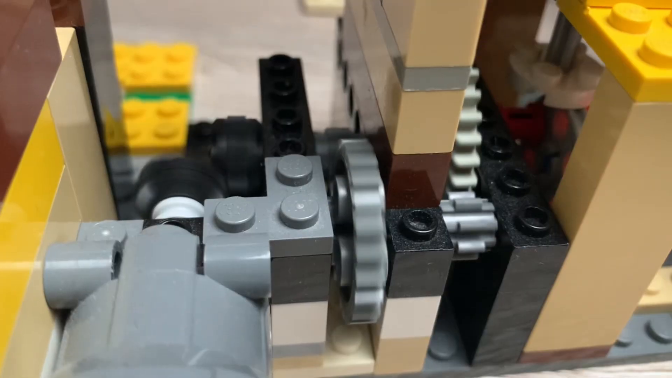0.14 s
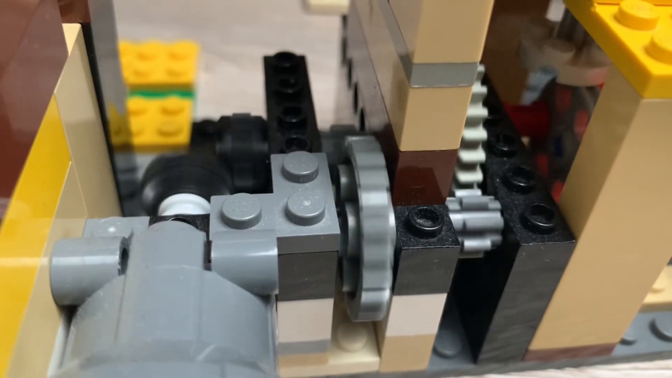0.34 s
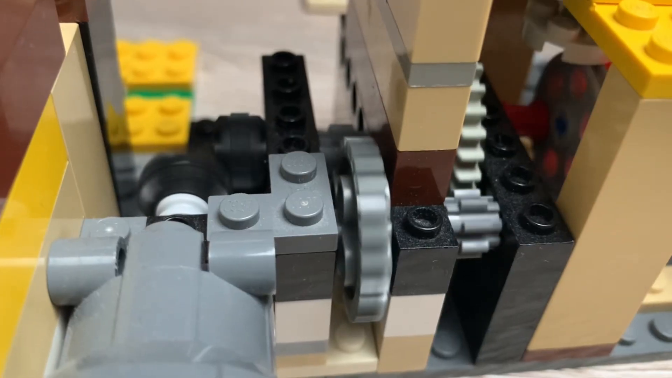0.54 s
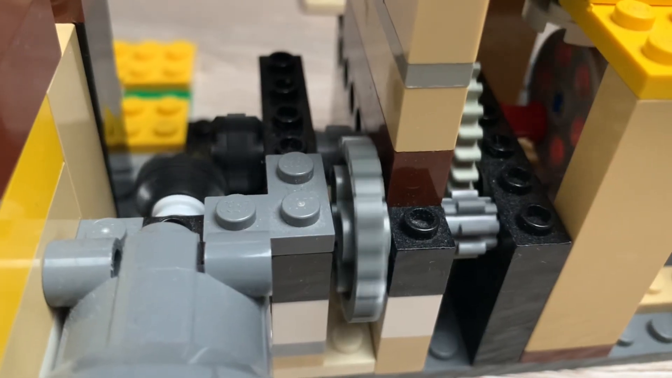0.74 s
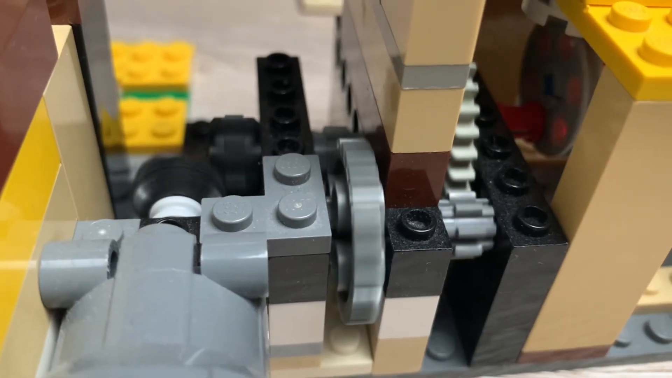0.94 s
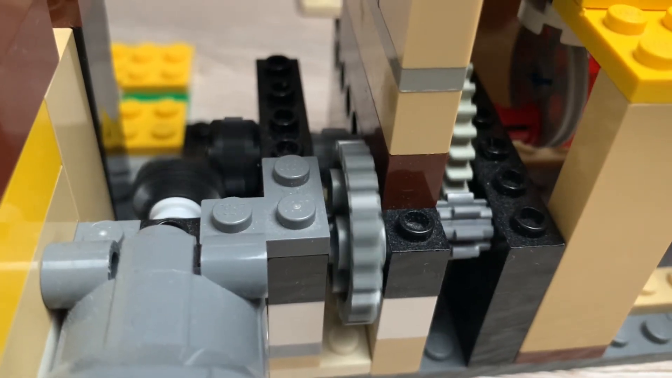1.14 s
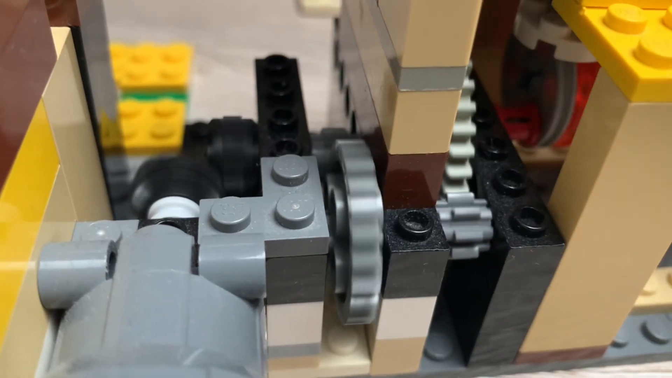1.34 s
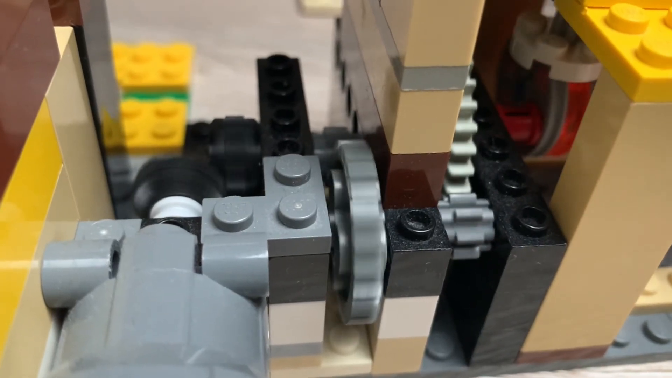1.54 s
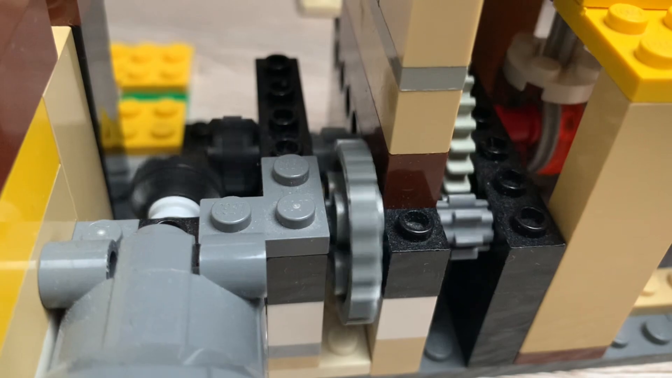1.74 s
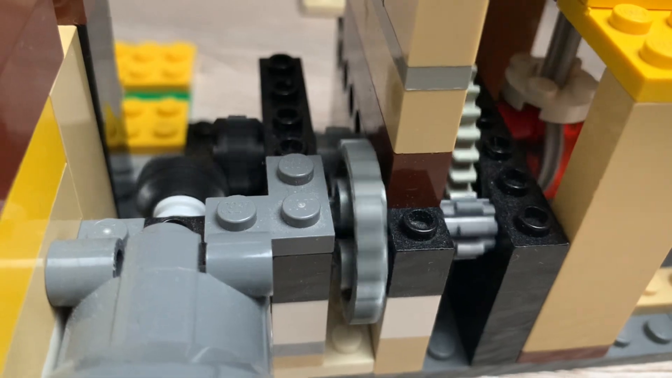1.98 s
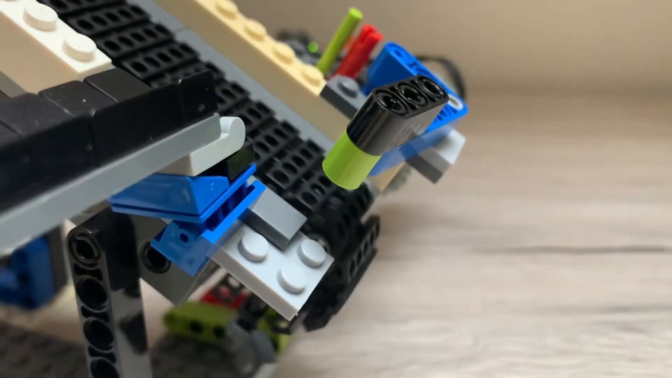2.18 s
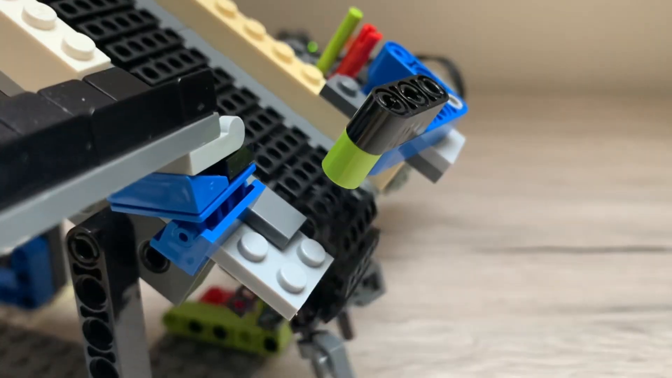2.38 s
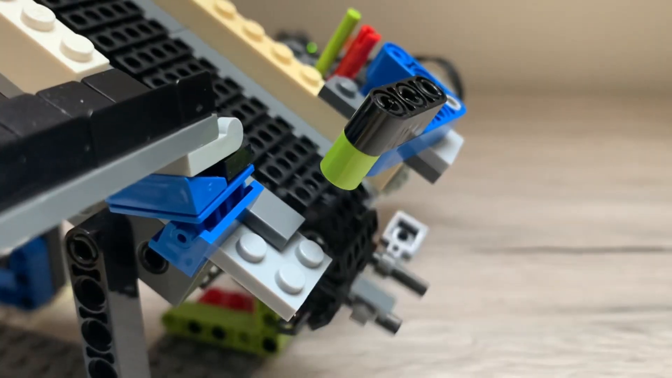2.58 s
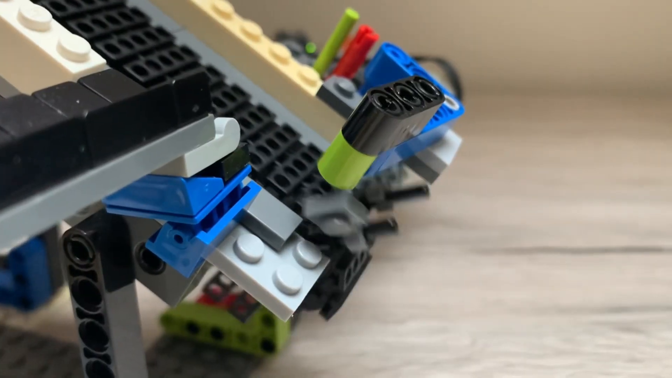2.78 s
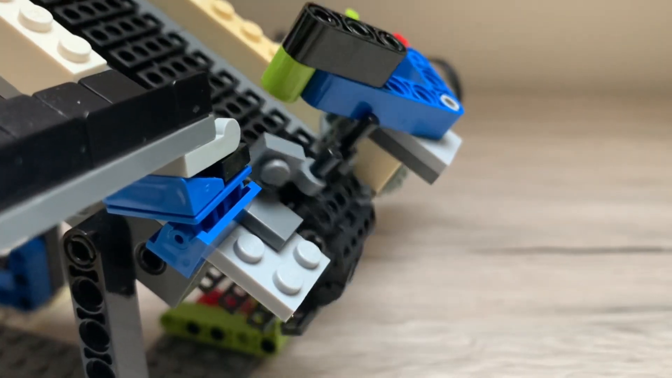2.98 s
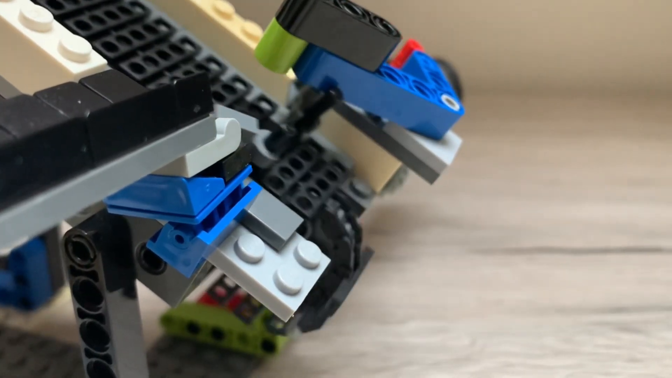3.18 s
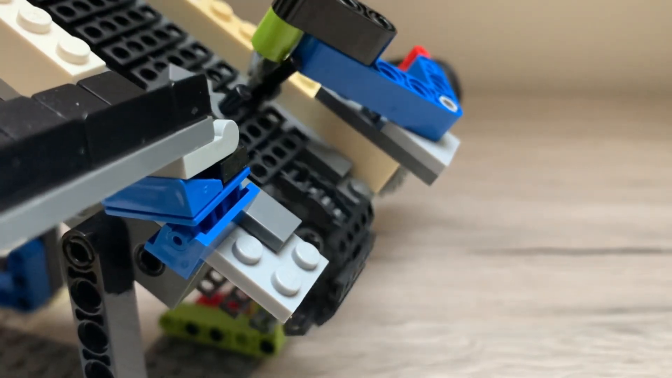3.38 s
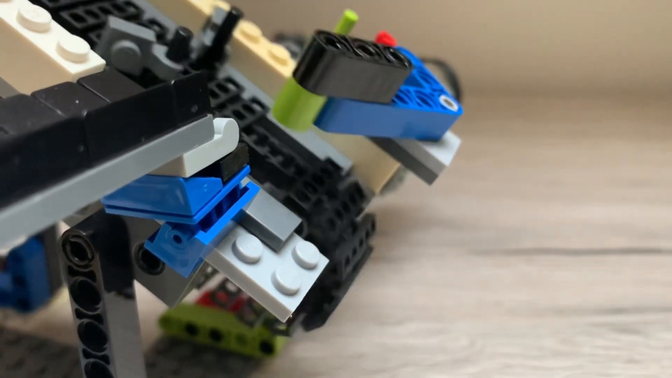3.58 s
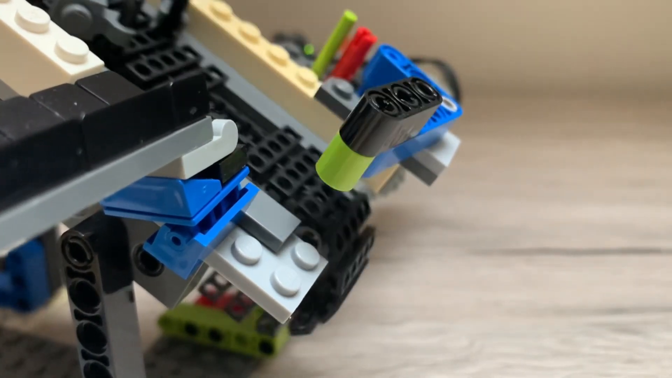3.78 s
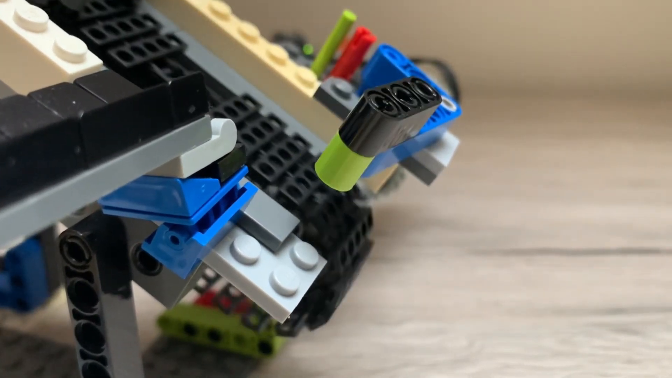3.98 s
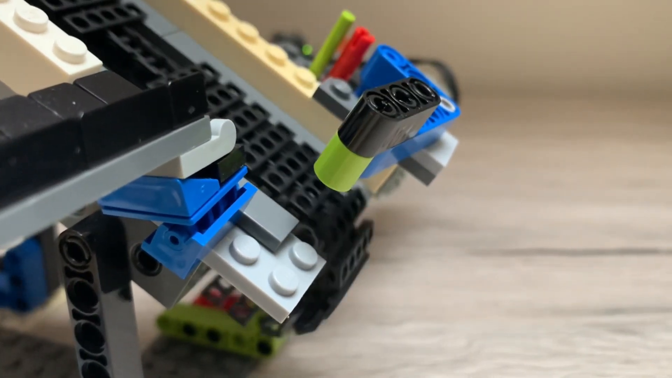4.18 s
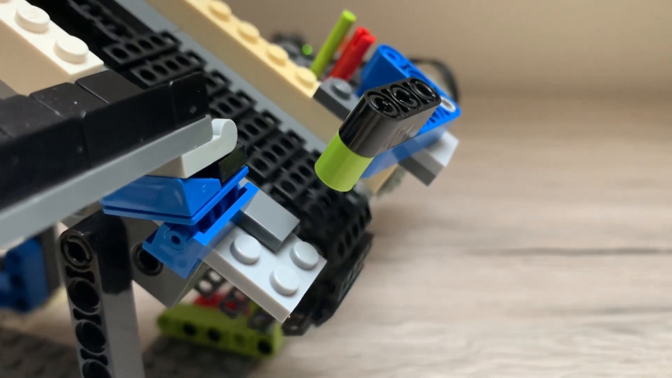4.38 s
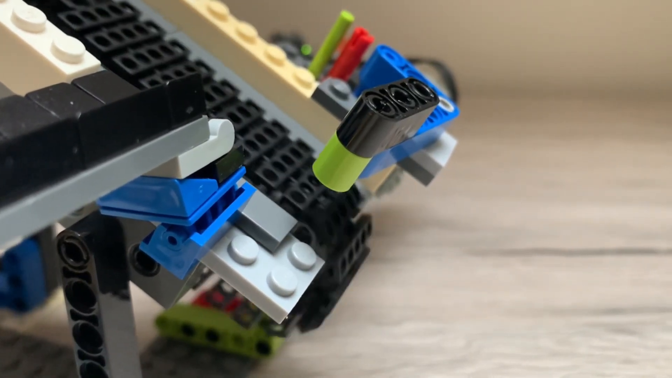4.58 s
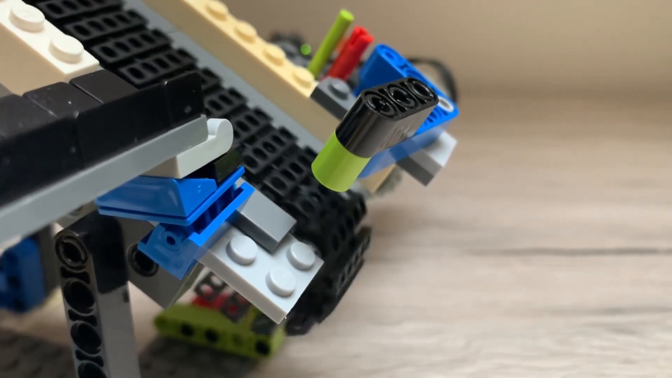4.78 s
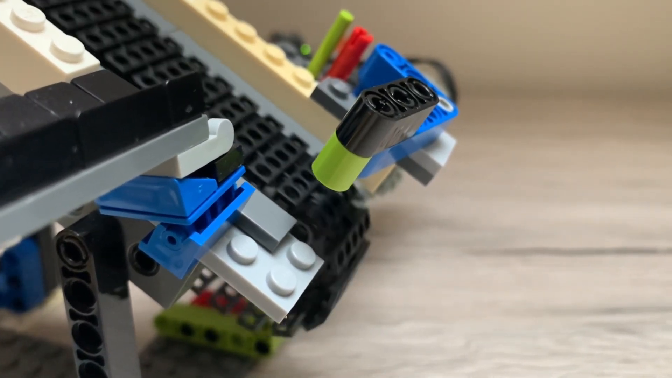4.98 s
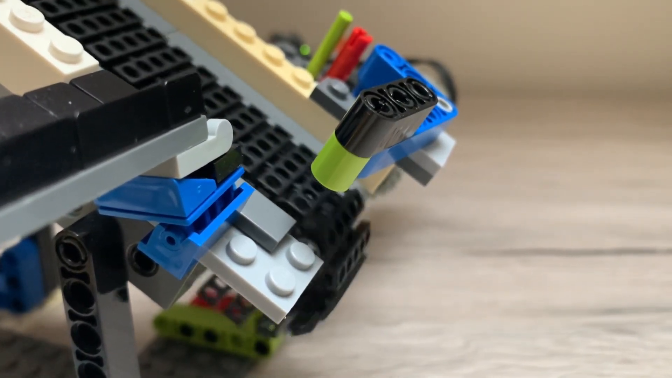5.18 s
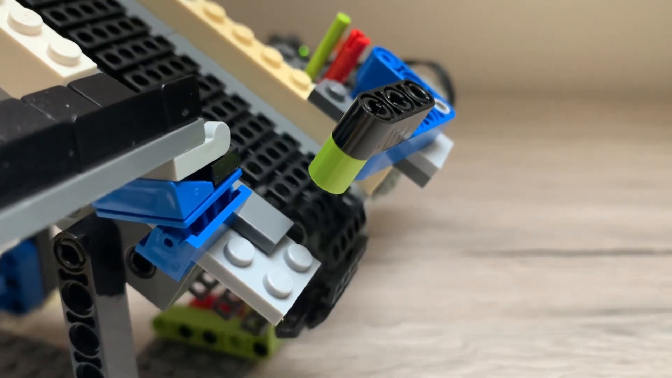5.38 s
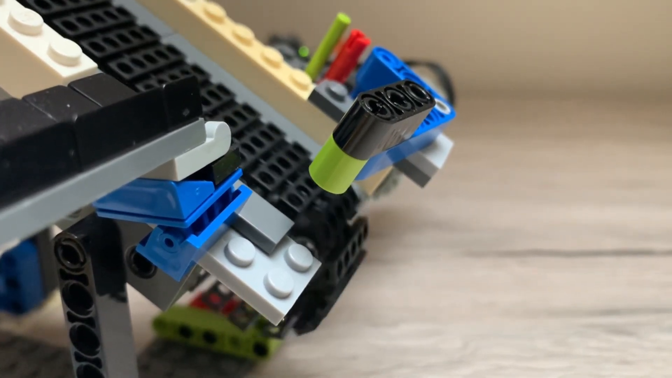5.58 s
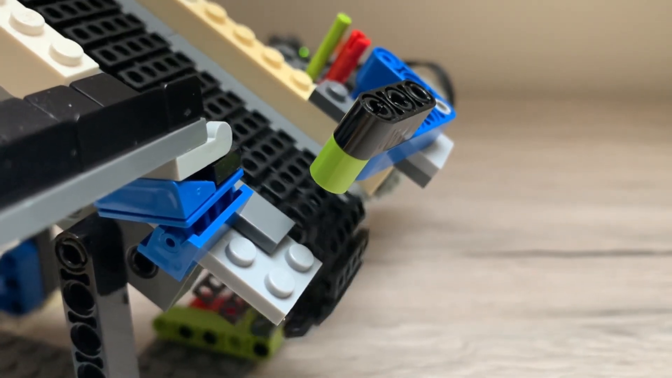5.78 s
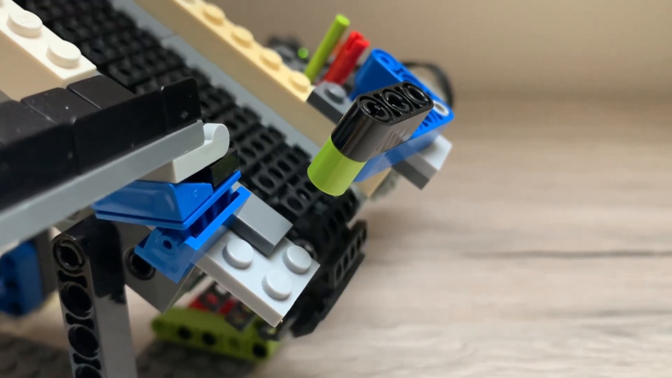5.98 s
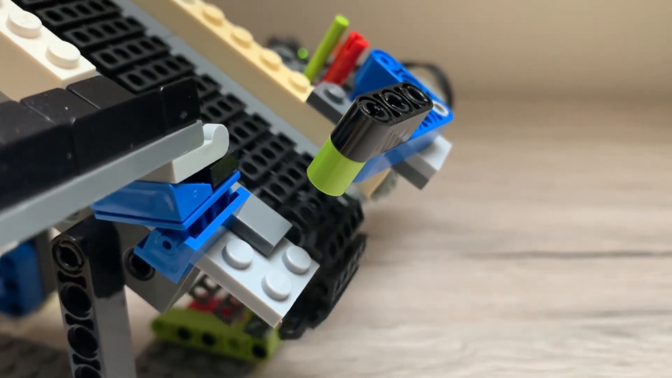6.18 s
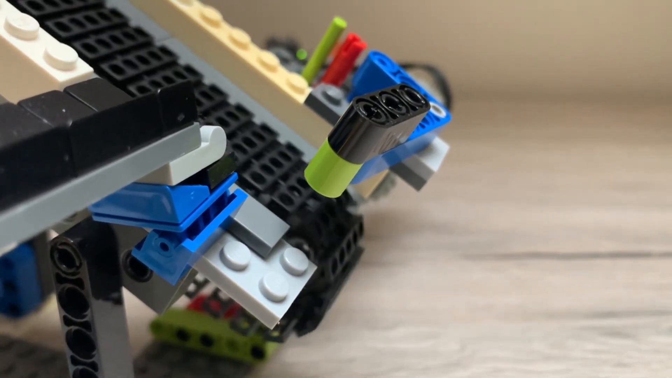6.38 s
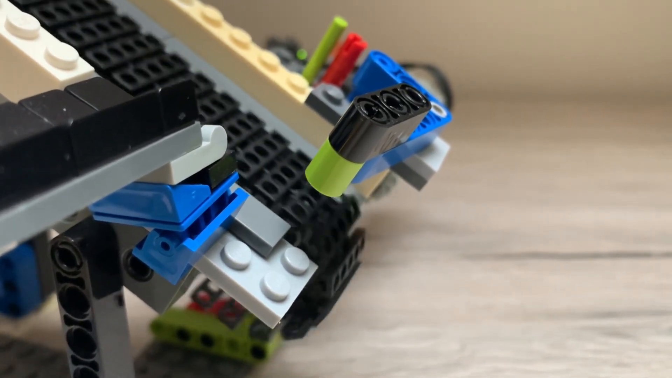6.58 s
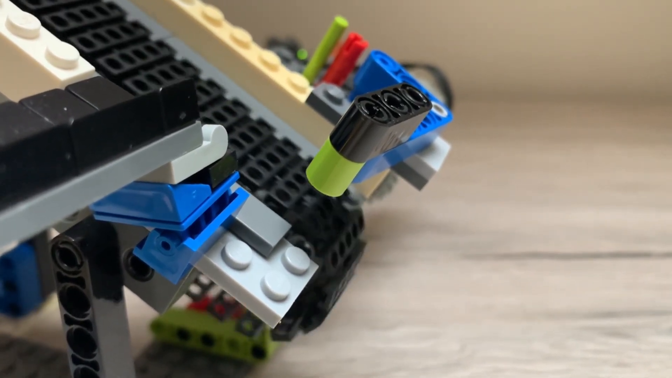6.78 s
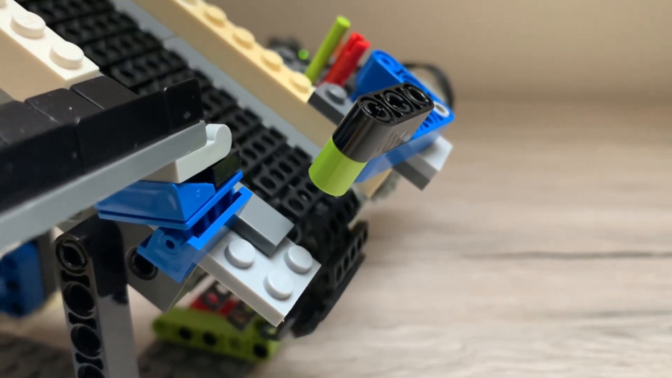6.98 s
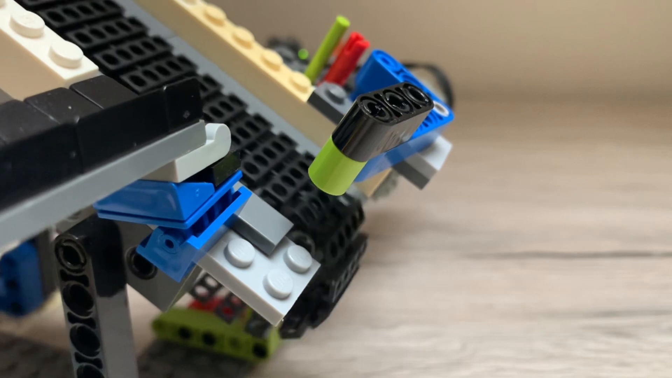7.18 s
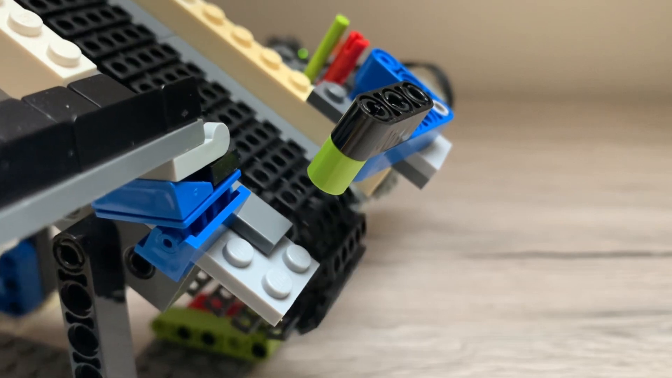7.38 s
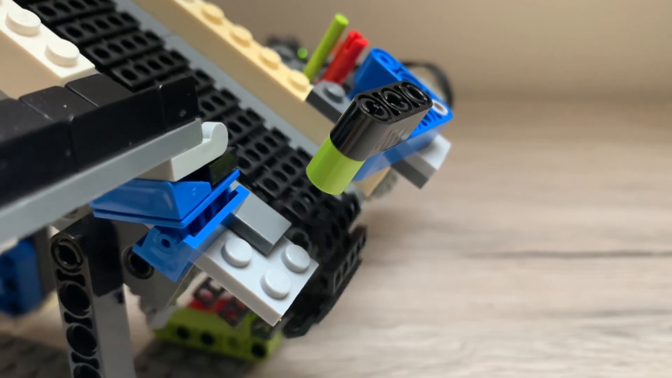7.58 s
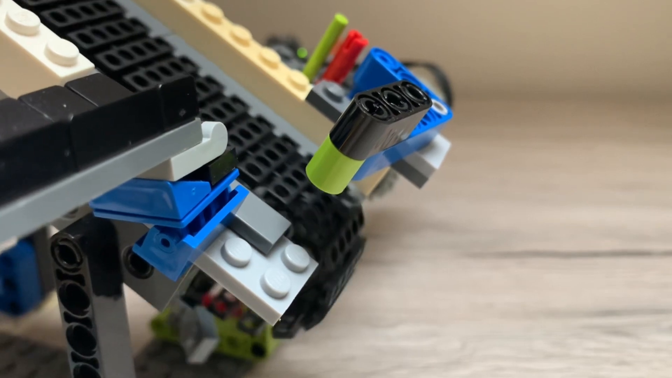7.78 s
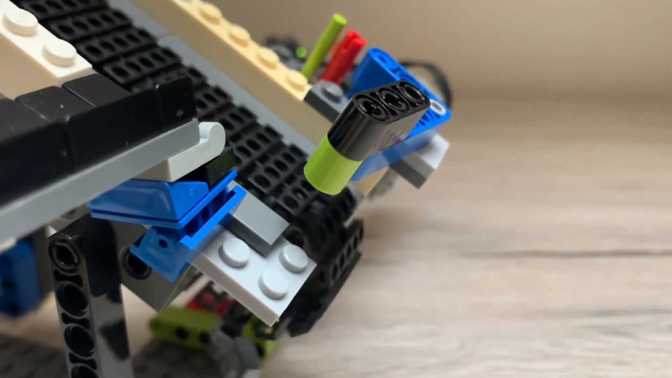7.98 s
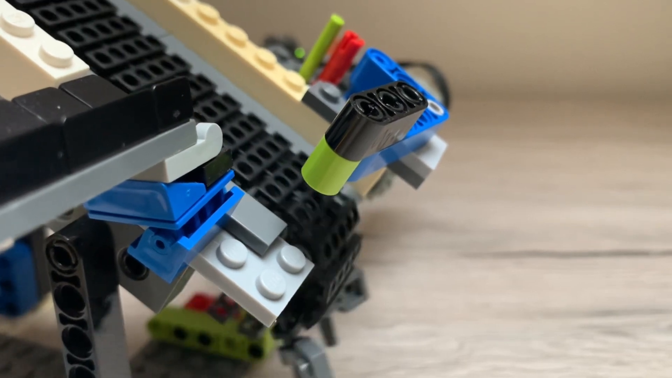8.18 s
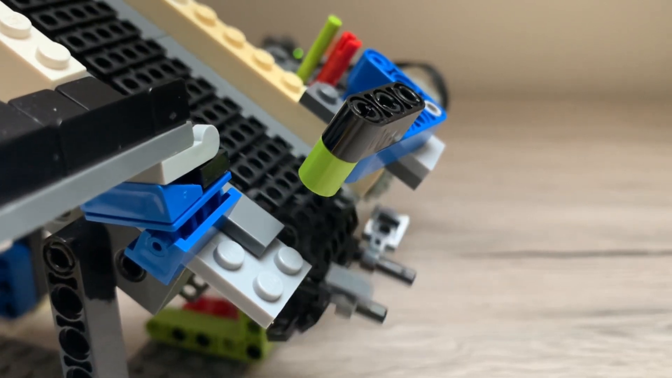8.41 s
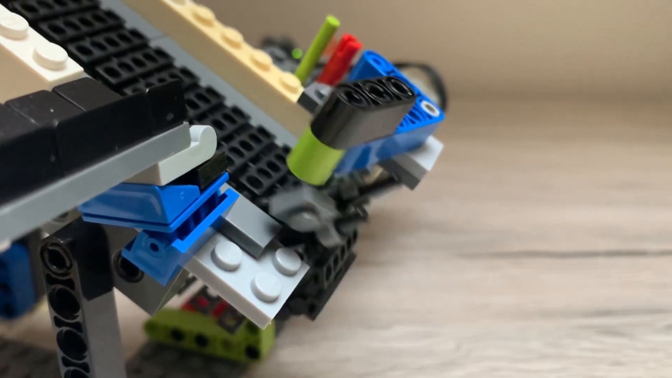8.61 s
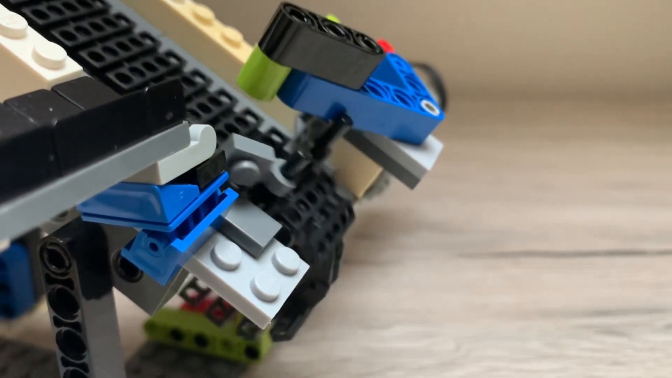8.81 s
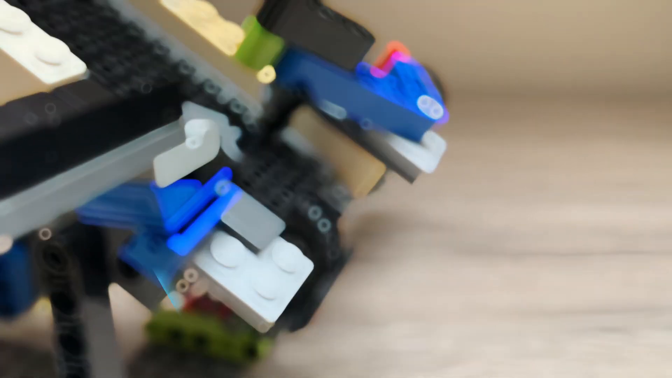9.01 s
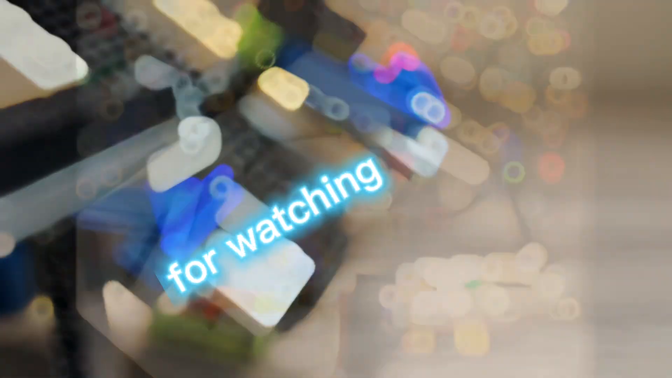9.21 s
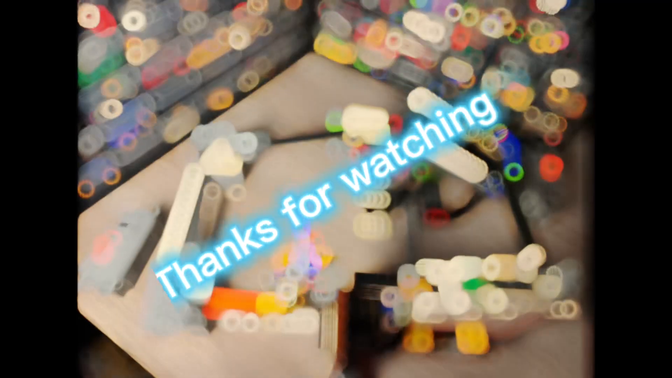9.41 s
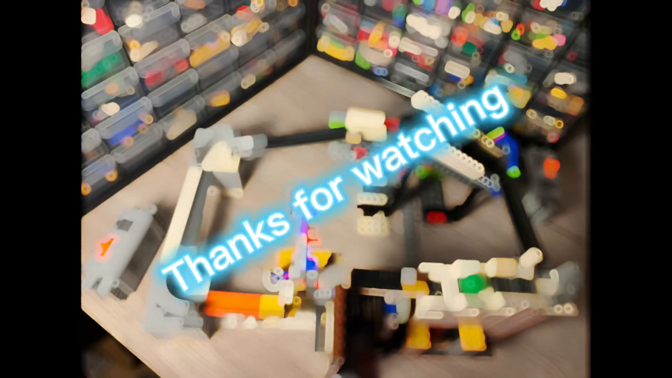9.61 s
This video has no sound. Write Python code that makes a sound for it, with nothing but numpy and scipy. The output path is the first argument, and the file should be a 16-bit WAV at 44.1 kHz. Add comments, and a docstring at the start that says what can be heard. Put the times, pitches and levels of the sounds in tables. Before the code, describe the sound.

From 0 to about 2.1 seconds, a small electric motor runs very close by: a bright, dense, buzzy whine with brush hiss and plastic gear rub, swelling nearly six times a second as the gears bind, with brief uneven grating rasps. It cuts off abruptly, leaving a tiny gap. From 2.1 seconds to the end, a distinctly quieter chain lift runs steadily: airy high hiss, fluttering link chatter, light ramp rattle and a faint low motor hum. A light plastic knock comes at 2.9; a faint scrape at 3.35 leads to a sharp double clack at 3.5 as a lever falls back, with a small tabletop thud and soft settling knock. Tiny link taps continue, with a small clink at 5.7. Near 9.1 another scrape precedes a second, similar double clack at 9.3, while the lift keeps running. Close, dry, stereo, quiet indoor tabletop.

```python
"""A plastic-brick marble run, close up. First a small electric motor whines as summed shaft overtones, while
brush and gear noise swells with a load that peaks once a turn. After a brief gap comes the quieter chain lift:
noise shaped by link and ramp resonances, with a far motor's hum. Now and then a rider on the chain bumps the
track. Twice, during the lift, it pushes a lever aside, which drops back with a double click: contact noise
and decaying modes of the arm, frame and table."""
import sys
import numpy as np
from scipy import signal
from scipy.fft import rfft, irfft, next_fast_len
from scipy.io import wavfile
from scipy.ndimage import uniform_filter1d, map_coordinates

SR = 44100
rng = np.random.default_rng(int(sys.argv[2]) if len(sys.argv) > 2 else 0)


def file_out(sig):
    """Save sig as 16-bit WAV at sys.argv[1]."""
    # one column per channel
    cols = np.atleast_2d(sig).T
    # limit, then scale
    lim = np.clip(cols, -1, 1)
    pcm = np.round(lim * 32767).astype(np.int16)
    wavfile.write(sys.argv[1], SR, pcm)


N = 425561
TIME = np.arange(N) / SR

GEAR_END_S, LIFT_START_S = 2.076, 2.095
GIVE_S = 0.0014  # loose plastic parts give a little, so a blow builds up briefly
# rumble spectrum of the tabletop: (frequency [Hz], relative density [dB per Hz])
TABLE_RUMBLE = [(15, -66), (30, -20), (45, -17), (70, 1.5), (115, -3.5), (155, -1), (200, -9.5),
                (330, -13.5), (700, -20), (2000, -102)]
# modes of the tabletop under a blow: (frequency [Hz], width [Hz], relative level [dB])
TABLETOP_MODES = [(69, 23, -1), (99, 21, 8.5), (162, 55, -2.5), (290, 170, -10)]
# gearbox resonances: (frequency [Hz], width [Hz], relative level [dB])
GEARBOX_MODES = [(735, 70, -8), (1734, 170, -4), (2060, 110, 0), (2432, 88, 4.5), (3130, 230, -7),
                 (3640, 78, -15), (4450, 120, -9), (4870, 170, -4)]
# spectrum of a snapping or scraping contact: (frequency [Hz], relative density [dB per Hz])
SNAP_COLOUR = [(800, -32), (2500, -42), (3600, 5.5), (6000, 7.5), (9000, 11), (12000, 11.5), (15500, 4)]


def amp(db):
    """Decibels to gain."""
    return 10 ** (np.asarray(db) / 20)


def unit(x):
    """Scale to rms 1."""
    return x / np.sqrt(np.mean(x ** 2) + 1e-20)


def along(points, hz):
    """Interpolation of (frequency [Hz], value) points on a logarithmic frequency axis."""
    f, v = np.transpose(points)
    return np.interp(np.log(hz + 1), np.log(f + 1), v)


def wobble(rate):
    """Band-limited fluctuation: a spline through random knots, rate knots a second."""
    knots = rng.standard_normal(int(N * rate / SR) + 4)
    return map_coordinates(knots, [TIME * rate])


def filtered(x, response):
    """Linear filtering: the spectrum of x times a complex response of frequency."""
    size = next_fast_len(N + SR // 4)
    hz = np.fft.rfftfreq(size, 1 / SR)
    return irfft(rfft(x, size) * response(hz), size)[..., :N]


def colour(points):
    """Spectral shaping: the response of a (frequency [Hz], level [dB]) spectrum."""
    return lambda hz: amp(along(points, hz))


def body(modes):
    """Modal superposition: the summed response of damped resonances of alternating sign."""
    def response(f):
        total = 0
        for k, (centre, width, db) in enumerate(modes):
            resonance = 1j * f * width / (centre * centre - f * f + 1j * f * width)
            total = total + (-1) ** k * amp(db) * resonance
        return total
    return response


def arrival(hz):
    """Interaural-style delay as phase: bass in step, middle range first at left, treble first at right."""
    midrange_lead_s, treble_lag_s = .00056, .000295  # of the left microphone against the right one
    bass_hz, treble_hz = 1844, 2919  # edges of the middle range
    midrange = midrange_lead_s * (1 - np.exp(-(hz / bass_hz) ** 2))
    lead_s = np.where(hz < treble_hz, midrange, -treble_lag_s)
    return 2 * np.pi * hz * lead_s * np.array([[.5], [-.5]])


def friction(force, response):
    """Partly coherent stereo noise driven by a force through a response; a force of 1 gives rms 1."""
    # sound common to both microphones: (frequency [Hz], share of the power [0 to 1])
    direct = [(200, .98), (600, .88), (1400, .5), (3000, .45), (6500, .4), (8300, .9), (15000, .9)]
    size = next_fast_len(N + SR // 4)
    hz = np.fft.rfftfreq(size, 1 / SR)
    noise = rfft(rng.standard_normal((3, N)) * force, size)
    share, gain = along(direct, hz), response(hz)
    # direct sound reaches both microphones, scattered sound differs between them
    common = np.sqrt(share) * np.exp(1j * arrival(hz)) * noise[0]
    scattered = np.sqrt(1 - share) * noise[1:]
    return irfft((common + scattered) * gain, size)[:, :N] / np.sqrt(np.mean(np.abs(gain) ** 2))


def tone(angle, hz):
    """Simple harmonic motion: a stereo sine of rms 1."""
    return np.sqrt(2) * np.sin(angle + arrival(hz))


def decays(times, sizes, t60):
    """Exponential energy decay: sudden rises that fall 60 dB in t60 seconds, added as power."""
    samples = np.clip(np.round(times * SR).astype(int), 0, N)
    kicks = np.bincount(samples, sizes ** 2, N + 1)[:N]
    return np.sqrt(signal.lfilter([1], [1, -amp(-120 / (t60 * SR))], kicks))


def blows(times, db, t60):
    """Compliant contact: the force of plastic parts builds up briefly and dies away."""
    force = decays(times + GIVE_S / 2, amp(db), t60)
    return uniform_filter1d(force, max(1, round(GIVE_S * SR)))


def ringing(times, db, modes, vary_db=2, detune=.008):
    """Free modal decay after a blow, a little different in strength and pitch each time."""
    out, t = np.zeros((2, N + SR)), np.arange(SR // 8) / SR
    hz, width, level = np.transpose(modes)
    share = amp(level) * width / np.linalg.norm(amp(level) * width)
    chances = rng.standard_normal((len(times), len(modes), 2))
    for s, peak, chance in zip(times, db, chances):
        ring = 0
        for f, w, g, (a, b) in zip(hz, width, share, chance):
            decay = g * amp(vary_db * a) * np.exp(-np.pi * w * t)
            ring = ring + decay * tone(2 * np.pi * f * (1 + detune * b) * t, f)
        out[:, round(s * SR):][:, :len(t)] += amp(peak) * ring * np.minimum(t / GIVE_S, 1)
    return out[:, :N]


def link_jostle(hz, scatter_db, late, t60):
    """Irregular impacts: links knock one after another, each a little off time and of its own strength."""
    order = np.arange(int(hz * N / SR))
    delay, strength = rng.uniform(-0.83, 1, (len(order), 2)).T
    return unit(decays(order / hz + late * delay, amp(scatter_db * strength), t60))


def chain_lift():
    """Amplitude modulation: sprockets tug the chain, links chatter, the ramp resonates, a far motor hums."""
    # even tooth beats of the lift's wheels: (rate [Hz], swing of the tug [dB])
    sprockets = [(17.9, .8), (20.3, .4), (29.4, .52), (35.8, .15), (70.1, .22), (88, .38), (108.5, .34)]
    # spectra of chattering link pins and sliding links: (frequency [Hz], relative density [dB per Hz])
    pin_colour, rub_colour = [(2000, -45), (4100, -15), (5000, -4.5), (6600, -4.5), (8600, .5), (10400, 0),
                              (13000, -.5), (15500, -5)], [(150, -0.5), (320, -6.5), (450, -4), (900, 1.5),
                                                  (1300, 3.5), (1650, -0.5), (2200, -11), (3000, -11),
                                                  (5000, 3), (9000, -74)]
    # resonances of links, ramp, its loose side rail and the cavity under it:
    # (frequency [Hz], width [Hz], relative level [dB])
    link_modes, ramp_modes = [(5077, 76, 4.5), (5466, 68, 4.5), (6005, 110, 2.5), (6260, 36, 2),
                              (6890, 39, 0.5), (7190, 43, 2.5), (7600, 340, 6), (9580, 120, -3),
                              (10530, 57, 8.5), (12900, 190, 1), (13600, 200, -2)], [(448.5, 25.3, -9), (1246, 15, -7.5), (1877, 44, -10.5),
                                             (2183, 38, -12), (3290, 30, -13), (3475, 40, -11.5),
                                             (3760, 36, -5.5), (4670, 177, -11.5)]
    rail_modes, hollow_modes = [(2560, 70, 0), (3430, 150, -8)], [(550, 39, 0)]
    # slack links tap the ramp: (time [s], relative peak [dB])
    link_knocks = [(3.801, -45.5), (3.976, -44.5), (4.48, -46), (4.82, -50), (5.485, -45), (7.482, -48),
                   (7.649, -41), (8.15, -49)]
    # lines of the far motor: (frequency [Hz], mean level [dB])
    hum_lines = [(145.3, -68), (452.2, -76), (678.3, -80), (748.3, -80), (866, -81), (1217, -81)]

    # the jerking chain makes the motor's speed waver, which blurs its higher lines
    turning = TIME + np.cumsum(.011 * wobble(90) + .005 * wobble(8)) / SR
    tug_db = sum(db * np.cos(2 * np.pi * (hz * turning + rng.random())) for hz, db in sprockets)
    tug = unit(amp(tug_db))
    force = unit(tug * amp(1.08 * wobble(130) + 0.63 * wobble(900)))
    hiss = amp(-39.2) * friction(force, colour(pin_colour))
    links = amp(-44) * friction(force, body(link_modes))
    rub_force = unit(tug * amp(1.8 * wobble(120) + 0.9 * wobble(20)))
    rub = amp(-58) * friction(rub_force, colour(rub_colour))

    # links jostle against the ramp at uneven times and strengths
    jostle = link_jostle(hz=75, scatter_db=5, late=.012, t60=.05)
    shaking = unit(np.sqrt(tug * (jostle ** 2 + .8)))
    rail = amp(-61.0) * friction(unit(shaking * amp(1.5 * wobble(22))), body(rail_modes))
    ramp = amp(-56.5) * friction(shaking, body(ramp_modes)) + rail

    times, peak = np.transpose(link_knocks)
    knocks = friction(decays(times, amp(peak - 6), t60=0.049), body(hollow_modes))
    hum = sum(amp(db + 1.33 * wobble(10)) * tone(2 * np.pi * hz * turning, hz) for hz, db in hum_lines)
    rumble = amp(-63) * friction(amp(0.51 * wobble(10.0)), colour(TABLE_RUMBLE))
    opposed = amp([[-.3], [.3]])  # small level difference between left and right [dB]
    return (hiss + links + rub + ramp) * opposed + knocks + hum + rumble


def rasps(shaft):
    """Stick-slip: teeth that catch grate for a moment, in one burst per turn of the motor shaft."""
    # the teeth catch and rasp: (time [s], relative gearbox level [dB], relative grit level [dB])
    catches = [(.272, -38, -40), (.468, -35, -41), (.645, -34, -42), (.785, -41, -36.5), (.812, -36, -50),
               (1.17, -35, -46), (1.322, -40, -51), (1.478, -46, -40), (1.828, -44, -42), (2.035, -38, -50)]
    # ringing of the gear wheels: (frequency [Hz], width [Hz], relative level [dB])
    grit_modes = [(2370, 250, -6), (3590, 360, 1), (4350, 270, -4), (4900, 300, -23)]
    catch_s = 0.012  # standard deviation of the bell-shaped swell
    times, box_db, grit_db = np.transpose(catches)

    def swell(levels):
        """Gaussian envelope of the catches."""
        total = 0
        for s, db in zip(times, levels):
            total = total + amp(db) * np.exp(-np.minimum(((TIME - s) / catch_s) ** 2 / 2, 20))
        return total

    bursts = unit(amp(-3.0 * np.cos(shaft) + 1.1 * wobble(140)))
    box = friction(bursts * swell(box_db), body(GEARBOX_MODES)) * amp([[1.8], [-1.8]])
    return amp(-1.5) * (box + friction(bursts * swell(grit_db), body(grit_modes)))


def buzz(shaft):
    """Periodic impulse excitation: the pinion ticks once a turn, which gives a fine, dense buzz."""
    # ringing of the motor's pinion: (frequency [Hz], width [Hz], relative level [dB])
    pinion_modes = [(3600, 320, 0), (4450, 200, 1), (4940, 250, 7), (5940, 370, -8)]
    ticks = np.diff(np.floor(shaft / (2 * np.pi)), prepend=0) > 0
    uneven_ticks = ticks * amp(2.6 * wobble(140))
    ring = filtered(uneven_ticks, lambda hz: body(pinion_modes)(hz) * np.exp(1j * arrival(hz)))
    return amp(-53) * unit(ring)


def gear_train(turn_s=.1735, heaviest_s=0.13, sag=0.0038):
    """Load modulation: a three-pole motor's gears bind once a turn; speed sags and the teeth rub harder."""
    # mean speed of the motor shaft: (time [s], rate [Hz])
    shaft_speed = [(0, 138.3), (.6, 138.7), (1.0, 139), (2.05, 138.5)]
    # overtones of the motor: (multiple of the shaft speed, relative level [dB])
    overtones = [(2, -65.5), (3, -46.5), (5, -61), (6, -56.5), (7, -61.5), (9, -47), (11, -45), (12, -83),
                 (13, -57), (14, -47), (15, -53), (16, -51), (17, -60.5), (18, -58), (21, -45), (22, -56),
                 (23, -49), (26, -58), (27, -69), (31, -54), (32, -58), (35, -72)]
    # spectra of scraping brushes and sliding teeth: (frequency [Hz], relative density [dB per Hz])
    brush_colour, rub_colour = [(1000, -60), (4500, -15.5), (6000, -9.5), (7300, -3.5), (8600, 1),
                                (9100, -4), (9900, -3.5), (10400, -9), (11500, -4.5), (13500, -7),
                                (15500, -18)], [(250, -13.5), (450, -6.5), (750, -0.5), (1000, -4),
                                                    (1400, 6.5), (2300, -0.5), (2700, -1.5), (3700, 4),
                                                    (5500, -9), (9000, -43)]

    load = np.cos(2 * np.pi * (TIME - heaviest_s) / turn_s)
    mean_speed = np.interp(TIME, *np.transpose(shaft_speed))
    speed = mean_speed * (1 - sag * load + 0.001473 * wobble(25.4))
    shaft = 2 * np.pi * np.cumsum(speed) / SR

    # two gear pairs add tooth rates that are no whole multiples of the shaft speed
    lines = [(round(k), db) for k, db in overtones] + [(17.72, -46), (1.115, -62.5)]
    backlash = 0.014 * wobble(150)  # radians of shaft angle; shakes the high lines most
    whine = 0
    for k, db in lines:
        level = amp(db + (1.33 + 0.05 * k) * wobble(90))
        angle = k * (shaft + backlash + 0.02 * wobble(110))
        whine = whine + level * tone(angle, k * speed.mean())

    # the brushes scrape hardest around each of the three commutator gaps
    poles = np.cos(3 * shaft) + .4 * np.sin(2 * shaft)
    scrape_db = 1.0 * poles + 0.39 * np.cos(shaft) + 0.77 * load
    brushes = unit(amp(scrape_db + 1.1 * wobble(300) + 0.67 * wobble(25.33)))
    hiss = amp(-31.4) * friction(brushes, colour(brush_colour))

    mesh_db = 0.9 * load + 1.1 * np.cos(shaft) + 0.91 * poles
    mesh = unit(amp(mesh_db + 1.3 * wobble(220) + .7 * wobble(31.8)))
    rub = amp(-42) * friction(unit(brushes * amp(0.71 * wobble(200))), colour(rub_colour))
    box = amp(-39.0) * friction(mesh, body(GEARBOX_MODES)) * amp([[1.8], [-1.8]])
    rumble = amp(-53) * friction(unit(amp(3.3 * load)), colour(TABLE_RUMBLE))
    whine = whine * amp([[.8], [-.8]])  # a little louder at left [dB]
    return whine + hiss + rub + box + rasps(shaft) + buzz(shaft + backlash / 2) + rumble


def frame_knocks(times, db, thud_db, shake_db):
    """Structure-borne sound: blows ring and rattle the frame, then thud into the table and shake it."""
    # ringing of the brick frame: (frequency [Hz], width [Hz], relative level [dB])
    frame_modes = [(530, 58, -1.5), (687, 55, -1.5), (1120, 180, -7.5), (1450, 58, -12), (1820, 130, 1.5),
                   (2110, 120, -11), (2750, 260, 6), (3560, 320, 7.5), (4480, 230, 6.5), (5700, 980, -14)]
    thud_late_s = 0.01564  # a blow reaches the table this much later
    rattle_hz = 1700  # the rattle is dulled above this

    ring = ringing(times, db + 9, frame_modes)
    crack = friction(blows(times, db + 2, t60=.014), body(frame_modes))
    rattle_force = blows(times, db - 4, t60=0.13)
    rattle = friction(rattle_force, lambda hz: body(frame_modes)(hz) / (1 + 1j * hz / rattle_hz))
    late = times + thud_late_s
    pushes = np.bincount(np.round(late * SR).astype(int), amp(thud_db), N)[:N]
    thud = filtered(pushes, body(TABLETOP_MODES))
    shake = friction(decays(late, amp(thud_db + shake_db), t60=0.41), colour(TABLE_RUMBLE))
    return ring + crack + rattle + thud + shake


def rider():
    """Impact and sliding friction: the rider scrapes along the track, clinks against it, knocks the frame."""
    # bumps against the track on its way round:
    # (time [s], frame [dB], own ring [dB], scrape [dB], table thud [dB]), all relative levels
    bumps = [(2.8995, -44, -52, -46, -3), (3.716, -62, -55, -52, -9), (5.675, -66, -62, -38, -25),
             (5.683, -54, -47, -38, -18), (5.7036, -47, -34, -52, -1)]
    # ringing of the rider: (frequency [Hz], width [Hz], relative level [dB])
    rider_modes = [(2280, 250, -16), (2700, 130, -15), (3170, 240, -7)]
    times, frame, own, scrape, thud = np.transpose(bumps)
    clink = friction(blows(times, own, t60=.055), body(rider_modes))
    rub = friction(blows(times, scrape, t60=.07), colour(SNAP_COLOUR))
    return clink + rub + frame_knocks(times, frame, thud, shake_db=-50)


def lever():
    """Impact excitation: each contact of the falling lever snaps, rings the arm and knocks the frame."""
    # it falls back behind a passing rider:
    # (time of first strike [s], reference level [dB], delay until it settles [s])
    passes = [(3.5026, -14, .188), (9.272, -13.5, .179)]
    # contacts of every pass: scrapes over the rider, slips off it, strikes its stop, chatters against it,
    # rocks over, seats with its full weight, bounces once: (time from first strike [s], snap [dB],
    # frame [dB], arm [dB], soft knock [dB], table thud [dB]), levels relative to the pass
    cycle = [(-.1545, -15.5, -47, -47, -47, -12), (-.1515, -18, -33, -25, -31, 6),
             (0, -6.5, -24, -50, -38, 13.5), (.0052, -13, -26, -47, -33.5, 6),
             (.0175, -17, -27, -47, -30, 0), (0.0242, -8, -16, -45, -26.5, 14.5),
             (.034, -29, -28, -26, -23, 10)]
    # ringing of the lever arm, and of the baseplate as the lever seats:
    # (frequency [Hz], width [Hz], relative level [dB])
    arm_modes, plate_modes = [(1230, 200, 1), (2160, 67, 15)], [(134, 14, -7), (207, 10, 3), (297, 30, -3), (376, 39, 0)]
    # spectrum of a soft contact: (frequency [Hz], relative density [dB per Hz])
    dull_colour = [(120, -0.5), (400, -12), (1200, -8.5), (2400, -7.5), (5000, -33)]
    # delays after the first strike; levels against the pass
    seat_s, plate_db = .036, -33.5
    thump_s, thump_db = .046, -22.5
    settle_db = -33.5  # the last soft knock

    contacts = []
    for s, db, _ in passes:
        for after, *levels in cycle:
            contacts.append((s + after, *(db + np.array(levels))))
    times, snap, frame, arm, soft, thud = np.transpose(contacts)
    start, peak, settle = np.transpose(passes)

    click = friction(blows(times, snap, t60=0.026), colour(SNAP_COLOUR))
    settling = blows(start + settle, peak + settle_db, t60=0.17)
    knock = friction(blows(times, soft, t60=0.1) + settling, colour(dull_colour))
    plate = ringing(start + seat_s, peak + plate_db, plate_modes)
    # the two lowest table modes answer the seated lever
    thump = ringing(start + thump_s, peak + thump_db, TABLETOP_MODES[:2])
    arm_ring = ringing(times, arm, arm_modes)
    return click + arm_ring + knock + plate + thump + frame_knocks(times, frame, thud, shake_db=-50.5)


def scene():
    """Superposition: the gear-train scene ends; after a brief gap the scene changes to the lift, with rider and
    lever."""
    first = np.clip((GEAR_END_S - TIME) / .002, 0, 1)
    second = np.clip((TIME - LIFT_START_S) / .001, 0, 1)
    return first * gear_train() + second * chain_lift() + lever() + rider()


def record(dry, low_cut_hz=45, top_hz=15750):
    """Band limitation: a high-pass thins the deep bass and nothing at or above the top frequency is kept."""
    high_pass = signal.butter(4, low_cut_hz, "highpass", fs=SR, output="sos")
    thinned = signal.sosfilt(high_pass, dry)
    return filtered(thinned, lambda hz: hz < top_hz)


dry = scene()
out = record(dry)
file_out(out)
```